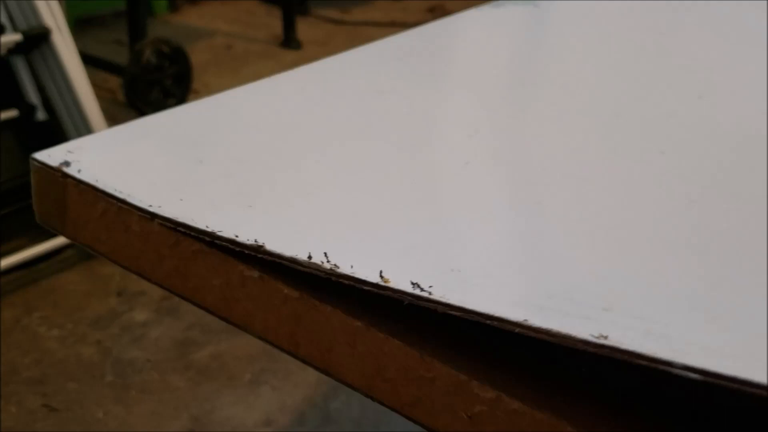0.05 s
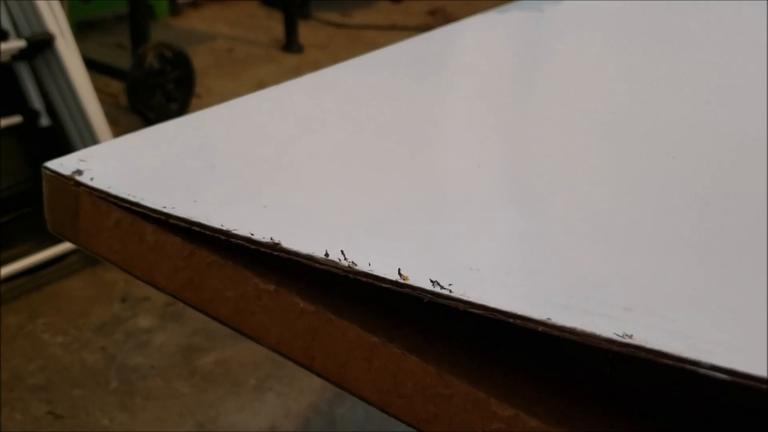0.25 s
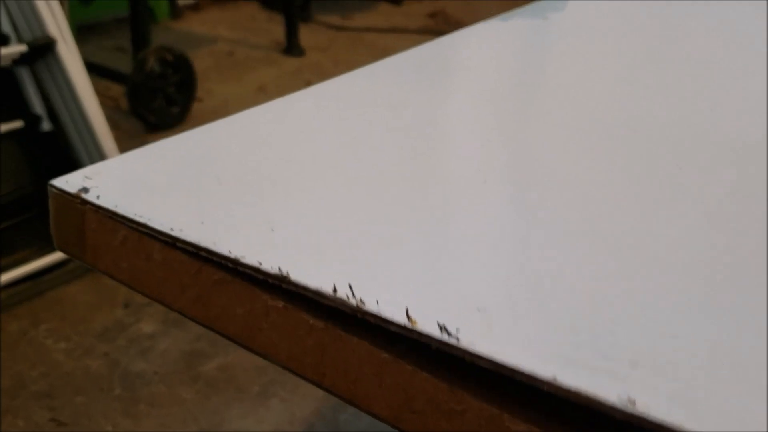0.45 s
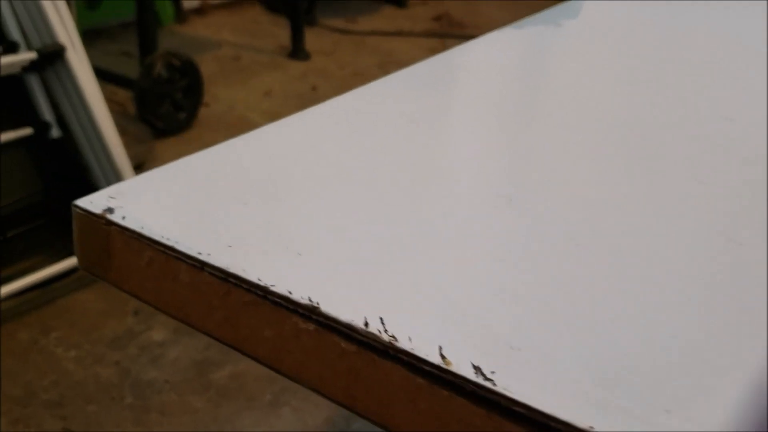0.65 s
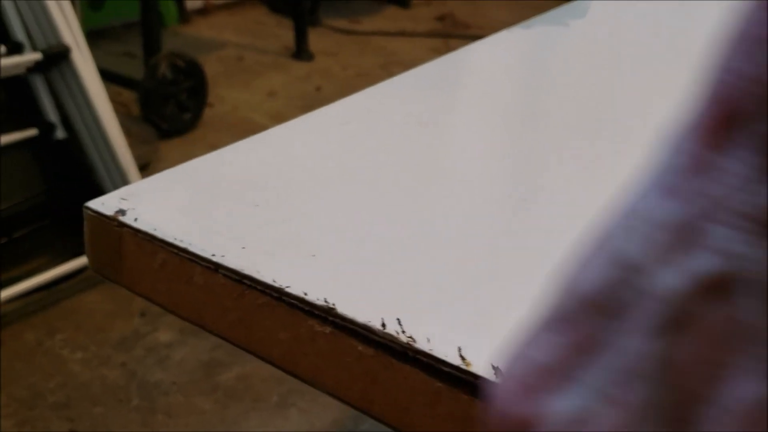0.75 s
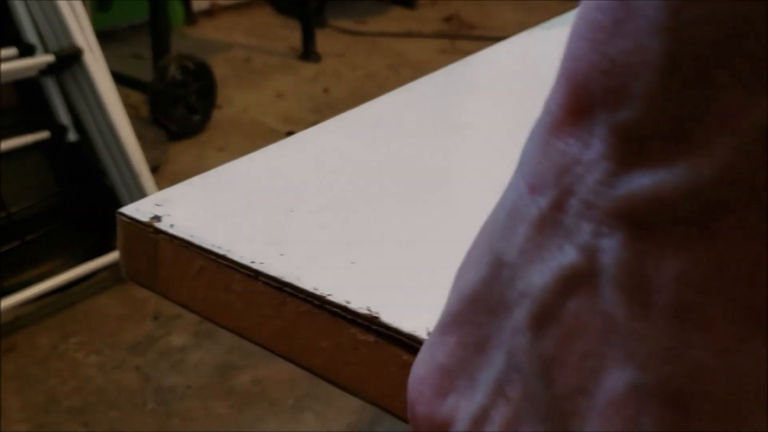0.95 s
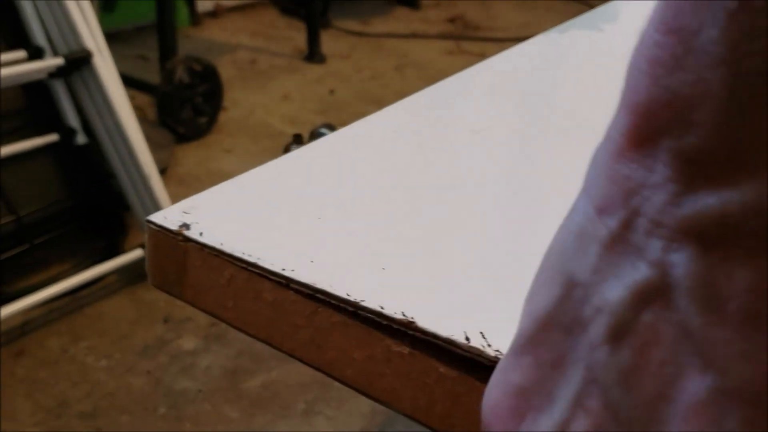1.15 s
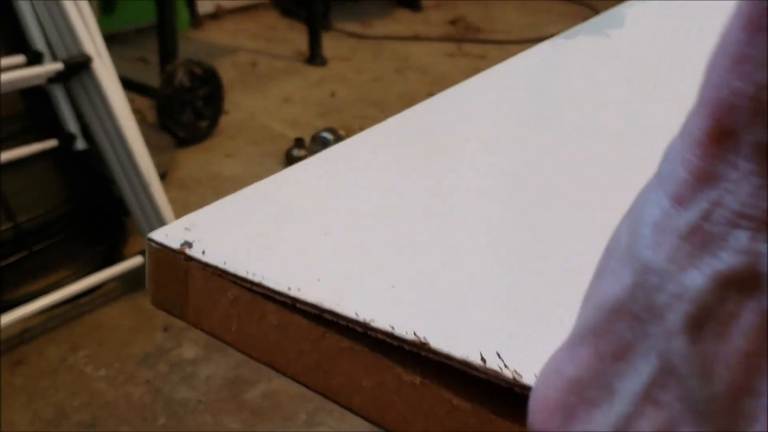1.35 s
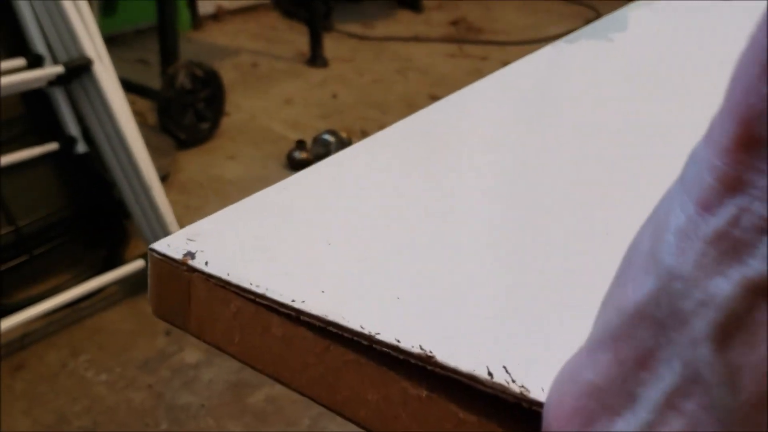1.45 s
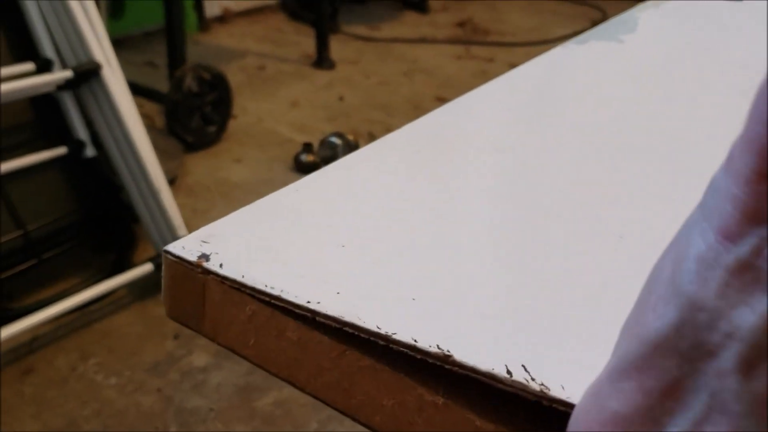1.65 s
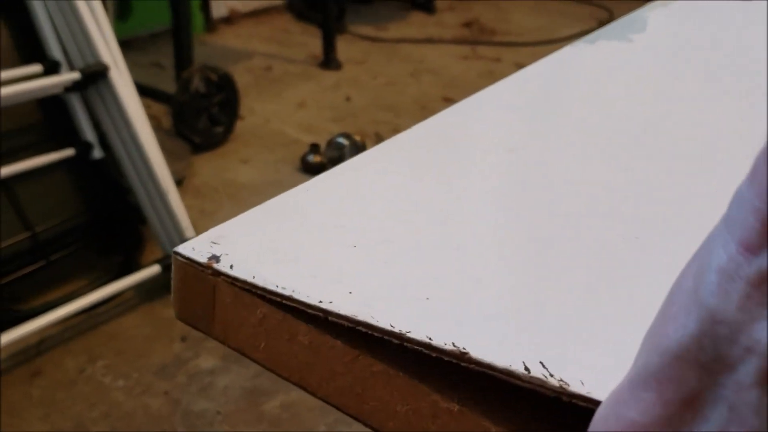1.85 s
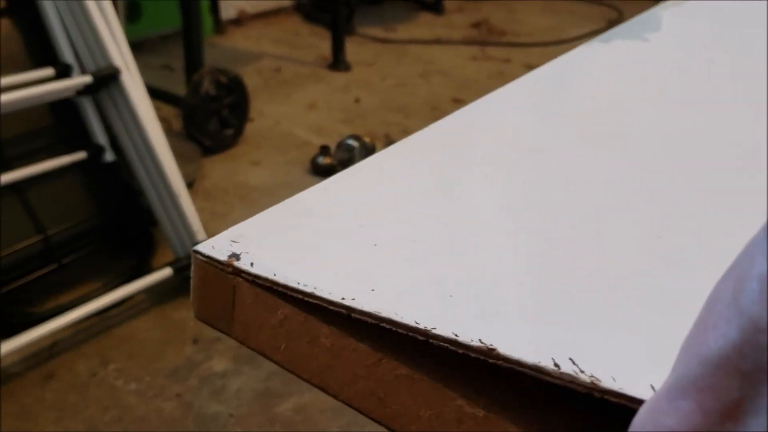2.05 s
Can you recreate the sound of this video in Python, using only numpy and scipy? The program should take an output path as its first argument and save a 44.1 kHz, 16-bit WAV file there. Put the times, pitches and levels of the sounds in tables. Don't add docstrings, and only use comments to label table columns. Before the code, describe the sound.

A putty knife pries the skin off a hollow door, close in a hard, lightly echoing workshop. A gritty scrape opens at 0 s, more grating builds, and a loud splitting snap with a hollow boom hits at 0.22 s. Small crackles and a knock near 0.6 s, soft rumbling and palm rub to 1 s, a tick at 1.28 s, then faint scrapes and bright fibre ticks around 1.75-2.07 s.

```python
import sys
import numpy as np
from scipy import signal
from scipy.fft import rfft, irfft
from scipy.io import wavfile

SR = 44100
rng = np.random.default_rng(int(sys.argv[2]) if len(sys.argv) > 2 else 0)


def undo_db(level):
    steps = np.asarray(level, float) / 20
    return 10 ** steps


def unload_wav(signal):
    wavfile.write(
        sys.argv[1],
        SR,
        np.round(np.clip(np.atleast_2d(signal).T, -1, 1) * 32767).astype(np.int16),
    )


N = 92874


def read(points, hz):
    f, value = np.transpose(points)
    return np.interp(np.log(hz + 1), np.log(f + 1), value)


def evened(x):
    return x / np.sqrt(np.mean(x ** 2) + 1e-20)


def tint(x, points, lag_s=0):
    hz = np.abs(np.fft.fftfreq(4096, 1 / SR))
    log_gain = np.log(undo_db(read(points, hz)))
    phase = -signal.hilbert(log_gain).imag
    taps = np.fft.ifft(np.exp(log_gain + 1j * phase)).real[:2048]
    delay = np.exp(-2j * np.pi * hz[:2049] * lag_s)
    taps = irfft(rfft(taps, 4096) * delay)
    return signal.oaconvolve(x, taps)[:N]


def add(mix, s, sound):
    part = mix[round(s * SR):][:len(sound)]
    part += sound[:len(part)]


def grains(per_s, spread_db):
    size = undo_db(spread_db * np.minimum(rng.exponential(1, N), 5))
    sign = rng.choice([-1., 1.], N)
    return evened(size * sign * (rng.random(N) < per_s / SR))


def bursts(rows):
    out, t = np.zeros(N), np.arange(800) / SR
    for s, db, length_s in rows:
        shape = np.exp(-t / length_s) * np.minimum(t / 0.00031, 1)
        add(out, s, undo_db(db) * rng.standard_normal(800) * shape)
    return out


def ring(modes, detune, centre_hz, octaves, signs, damped_s=9, size=SR // 4):
    t = np.arange(size) / SR
    hz, db, t60 = np.repeat(modes, 3, axis=0).T[:, :, None]
    sign = rng.choice(signs, hz.shape)
    off = rng.uniform(-1.05, 1, hz.shape)
    favour = np.exp(-.5 * (np.log2(hz / centre_hz) / octaves) ** 2)
    fading = undo_db(db - 60 * t / t60 - 60 * t / damped_s)
    tones = np.sin(2 * np.pi * hz * (1 + detune * off) * t)
    out = (sign * favour * fading * tones).sum(0)
    return out / np.linalg.norm(out)


SAG_DB, LIFT_S = -11, 0.041


def pressure(column, rows):
    t, power = np.arange(N) / SR, 0
    for row in rows:
        start_s, rise_s, hold_s = row[:3]
        u = t - start_s
        rise = np.clip(u / rise_s, 0, 1)
        held = np.clip((u - rise_s) / hold_s, 0, 1)
        after = np.maximum(u - rise_s - hold_s, 0)
        power = power + (rise * undo_db(row[column] + SAG_DB * held) * np.exp(-after / LIFT_S)) ** 2
    return np.sqrt(power)


# (f/Hz, level/dB)
HUSH_COLOUR = [(40, -12), (110, -8), (450, -6), (1200, -18), (2500, -28), (8000, -30), (15800, -24)]
HUSH_DB = -71


def hush():
    a, b = (tint(rng.standard_normal(N), HUSH_COLOUR) for _ in "LR")
    return undo_db(HUSH_DB) * evened(np.array([a, .6 * a + .8 * b]))


# (f/Hz, time to fall 60 dB/s)
ROOM_DECAY = [(100, 0.23), (400, 0.41), (1500, 0.33), (5000, 0.25), (14000, 0.36)]


def room(x):
    taps = np.zeros((2, SR))
    at = np.arange(300, SR - 20, 20) + rng.integers(0, 20, (2, (SR - 301) // 20))
    np.put_along_axis(taps, at, rng.choice([-1., 1.], at.shape), 1)
    hz, t, z = signal.stft(taps, SR, nperseg=256)
    fading = undo_db(-60 * t / read(ROOM_DECAY, hz)[:, None])
    tail = signal.istft(z * fading, SR, nperseg=256)[1]
    return signal.fftconvolve(x[None], tail / np.linalg.norm(tail[0]), axes=1)[:, :N]


# (t/s, rise/s, hold/s, level/dB)
SLIDES = [
    (.68, 0.074, 0.11, -56.5),
    (.79, 0.067, 0.079, -55),
    (1.17, 0.0066, .06, -57.5),
    (1.89, .03, 0.14, -53),
]
# (f/Hz, level/dB)
PALM_COLOUR = [(3000, -30), (8000, -22), (10500, -1.5), (13000, 1.5), (15800, -9)]


def palm():
    return evened(tint(rng.standard_normal(N), PALM_COLOUR)) * pressure(column=3, rows=SLIDES)


# (f/Hz, level/dB, time to fall 60 dB/s)
PANEL_MODES = [(51, -28, 0.5), (70.2, -1, 0.6), (91, -11.5, 0.38), (120, 2.5, 0.15), (171.6, -13, 0.3),
               (217, -14, 0.14), (270.8, -3.5, 0.35), (334.5, -2, 0.19), (383.6, -2, 0.21), (463, -6, 0.17),
               (526, -5, 0.23), (639.7, -6, 0.24), (800, 0.5, 0.065), (996, 4.5, 0.039)]
BUMPS_PER_S, DRAG_HZ, DRAG_OCTAVES = 900, 300, 1.42


def drag():
    push = pressure(column=4, rows=STROKES)
    out = np.zeros(N)
    for _ in range(6):
        bumps = grains(BUMPS_PER_S / 6, spread_db=1.0) * push
        spot = ring(PANEL_MODES, 0.1257, DRAG_HZ, DRAG_OCTAVES, signs=(-1, 1))
        out += 0.19 * signal.oaconvolve(bumps, spot)[:N]
    return out


# (t/s, level/dB, favoured f/Hz, spread/octaves, hand damping t60/s)
KNOCKS = [(.001, -39, 438, 0.78, 0.84), (.153, -44, 440, 0.19, 0.14), (.209, -41.5, 518, 0.2, .1),
          (0.2231, -19.5, 300, 0.48, 0.12), (.2245, -22.5, 385, 0.11, 1), (.226, -29.5, 538, 0.18, 0.74),
          (0.2255, -19, 1026, 0.36, 0.12), (.229, -25, 576, 0.5, 0.12), (0.239, -21, 125, 0.32, 0.8),
          (.256, -26.5, 330, 0.59, 0.16), (.29, -33.5, 332, 0.56, 0.068), (0.331, -38, 150, 0.65, 0.28),
          (.42, -53, 125, 0.42, 0.46), (.59, -36.5, 492, 0.4, 0.11), (0.595, -43, 110, 0.54, 0.48),
          (.61, -35, 257, 0.66, 0.63), (0.674, -46, 282, 0.26, 0.15), (0.726, -43, 266, 0.42, 0.26),
          (.761, -44, 325, 0.25, 0.32), (.786, -43, 177, 0.23, 0.16), (0.793, -41.5, 326, 0.13, 0.14),
          (.815, -41.5, 393, 0.17, .1), (.845, -50, 300, 0.61, .1), (0.862, -38, 175, 0.25, 0.23),
          (.875, -40.5, 381, 0.12, 0.19), (0.885, -44, 176, 0.1, 0.13), (0.927, -46, 170, 0.26, 0.16),
          (1.173, -52.5, 800, 0.39, 0.29), (1.2781, -37, 640, 1.34, 0.41), (1.49, -52, 124.4, 0.24, .1),
          (1.493, -59, 480, 0.32, .05), (1.513, -53, 168, .3, 0.058), (1.545, -61.5, 491, 0.31, 0.058),
          (1.778, -55.5, 251, 0.42, .1), (1.807, -51, 280, 0.24, 0.19), (1.945, -58.5, 408, 0.4, .1)]


def knocks():
    out = np.zeros(N)
    for s, db, hz, octaves, damped_s in KNOCKS:
        boom = ring(PANEL_MODES, 0.027, hz, octaves, signs=(-1, -1, -1, 1), damped_s=damped_s)
        add(out, s, 25 * undo_db(db) * boom)
    return out


# (f/Hz, level/dB, time to fall 60 dB/s)
SKIN_MODES = [(603, -10, .02), (834, -3, .025), (932, -1, 0.032), (1030, 0, 0.038), (1310, 4, 0.057),
              (1580, -12, .02), (1800, -7, 0.015), (2054, -8, 0.014), (2780, -8.5, .014), (3460, 2, 0.0089)]


def skin():
    out = np.zeros(N)
    for s, db, length_s, ring_db, hz in TICKS:
        kick = bursts([(.00032, 0, length_s)])[:800]
        patch = ring(SKIN_MODES, 0.034, hz, 0.072, signs=(1, 1), size=3000)
        rung = signal.oaconvolve(kick, patch)
        add(out, s, undo_db(db + ring_db) * rung / np.abs(rung).max())
    return out


# (t/s, peak level/dB, burst length/s, skin ring level/dB, ring f/Hz)
TICKS = [(.0005, -28.5, 0.0088, -14, 1480), (0.1677, -33, 0.0047, 5.5, 1350),
         (0.1757, -33.5, .003, 9, 1270), (0.187, -31, .002, 1, 1300), (0.203, -41, .003, 6, 1490),
         (0.2245, -13.5, 0.001, 1.5, 1300), (0.2263, -20, 0.0034, 8.5, 1030), (.232, -26, 0.0027, 7, 1030),
         (.238, -38.5, .003, 4, 800), (.26, -42, .003, 14.5, 1030), (.424, -41, 0.003, -16, 1600),
         (0.54, -51.5, 0.0028, -1, 1400), (1.153, -52.5, 0.0014, -12.5, 2890),
         (1.174, -39, .0025, -7, 3450), (1.238, -53, 0.0029, -1.5, 1440), (1.2788, -35, 0.0044, 5.5, 1030),
         (1.486, -65, 0.0032, 13, 820), (1.5098, -53.5, .001, 8.5, 960), (1.746, -64, 0.0043, 17, 800),
         (1.767, -63.5, .004, 18, 1800), (1.773, -67, 0.0033, 15, 815), (1.789, -61.5, 0.0073, 17.5, 800),
         (1.803, -70, 0.0048, 18, 800), (1.82, -68, 0.0037, 6, 800), (1.9392, -46, 0.0065, -2, 990),
         (1.954, -71, .004, 10, 900), (1.994, -66, 0.0055, 2.5, 850), (2.064, -43.5, 0.0036, 0.5, 950),
         (2.07, -66, 0.0034, 4, 1620)]
# (f/Hz, level/dB)
CRACK_COLOUR = [(880, -20), (1500, 9.5), (3200, 5), (5500, 4.5), (8700, 0.5), (12500, 5), (15800, 3.5)]
# (t/s, peak level/dB)
SPARKS = [(.204, -16), (.2153, -25.5), (.2295, -24), (.2315, -20), (.2348, -30.5), (1.425, -61.5),
          (1.441, -55.5), (.394, -36.5), (.399, -41.5), (.452, -40), (1.1955, -47), (1.301, -42),
          (1.773, -47), (1.852, -53), (1.8775, -42.5), (1.908, -37.5), (1.922, -35), (1.9597, -33),
          (1.9752, -33), (2.0045, -39), (2.01, -41.5), (2.073, -39)]
# (f/Hz, level/dB)
SPARK_COLOUR = [(3000, -47.5), (7000, -7.5), (10000, -8.5), (13000, 2)]
SPARK_S = 0.0022


def cracks():
    glue = bursts([tick[:3] for tick in TICKS])
    fibres = bursts([(s, db, SPARK_S) for s, db in SPARKS])
    return tint(glue, CRACK_COLOUR) + tint(fibres, SPARK_COLOUR)


CHATTER_HZ, CHATTER_DB = 140, 3


def chatter():
    band = signal.butter(2, [12, CHATTER_HZ], "band", fs=SR, output="sos")
    rough = signal.sosfilt(band, grains(300, spread_db=3.5))
    return undo_db(CHATTER_DB * np.clip(evened(rough), -2.5, 1.8))


# (t/s, rise/s, hold/s, grit level/dB, panel drag level/dB)
STROKES = [(-.02, 0.017, 0.029, -23, -30), (0.055, 0.021, 0.022, -35.5, -58),
           (0.101, 0.032, 0.055, -41, -70), (.136, 0.029, .12, -29, -38), (0.243, 0.0041, 0.11, -51, -29),
           (0.359, 0.0065, 0.061, -46, -42.5), (0.57, 0.015, 0.19, -60.5, -41.5),
           (0.633, 0.12, 0.21, -55, -42), (0.765, 0.074, 0.07, -52.5, -36), (0.909, 0.024, 0.14, -59, -50),
           (1.15, 0.0022, 0.0097, -50, -47.5), (1.192, 0.0082, 0.086, -53.5, -49.5),
           (1.292, 0.0074, 0.082, -48.5, -47.5), (1.397, 0.011, 0.088, -49.5, -52),
           (1.519, 0.021, 0.057, -62, -50.5), (1.604, 0.027, 0.06, -54, -93.5),
           (1.743, 0.015, 0.076, -43.5, -46.5), (1.846, 0.013, 0.1, -59.5, -54.5),
           (1.904, 0.039, 0.075, -51, -54.5), (2.01, 0.0054, 0.9, -53, -85)]
# (f/Hz, level/dB)
GRIT_COLOUR = [(250, -11.5), (1300, -4), (2600, -10), (7300, -10), (8400, -15), (9800, -11.5), (12500, -7),
               (15800, -8.5)]
GRAINS_PER_S, GRAIN_SPREAD_DB, SMOOTH = 5000, -0.5, 0.46


def blade(bite):
    hiss = rng.standard_normal(N)
    grit = (1 - SMOOTH) * grains(GRAINS_PER_S, GRAIN_SPREAD_DB) + SMOOTH * hiss
    return evened(tint(grit, GRIT_COLOUR)) * bite


# (f/Hz, level/dB)
LEAN = [(60, -5), (200, -3), (700, -3), (2000, -0.5), (6000, 1), (14000, 12.5)]
LEFT_LAG_S = .00025
WET_DB, PANEL_WET_DB = -4, -8


def scene():
    bite = pressure(column=3, rows=STROKES) * chatter()
    bright = blade(bite) + cracks()
    low = drag() + knocks() + skin()
    left, right = (blade(bite) + cracks() + palm() + low for _ in "LR")
    left = tint(left, [(f, db / 2) for f, db in LEAN], LEFT_LAG_S)
    right = tint(right, [(f, -db / 2) for f, db in LEAN])
    echo = room(undo_db(WET_DB) * bright + undo_db(PANEL_WET_DB) * low)
    return np.array([left, right]) + echo + hush()


def low_pass(x):
    return signal.sosfilt(signal.butter(12, 16500, fs=SR, output="sos"), x)


BASS_CUT_HZ, EDGE_HZ, PAST_EDGE_DB = 62, 15820, -52


def record(dry):
    x = signal.sosfilt(signal.butter(3, BASS_CUT_HZ, "high", fs=SR, output="sos"), dry)
    lowpass = signal.firwin(511, EDGE_HZ, window=("kaiser", 9), fs=SR)
    edge = signal.oaconvolve(x, lowpass[None], "same")
    return low_pass(edge + undo_db(PAST_EDGE_DB) * (x - edge))


dry = scene()
out = record(dry)
unload_wav(out)
```